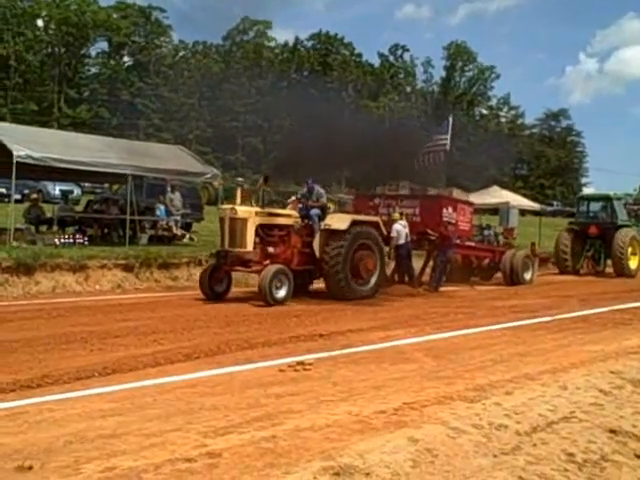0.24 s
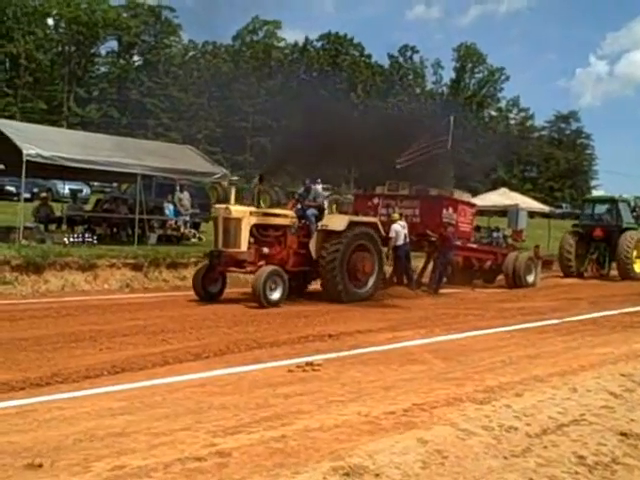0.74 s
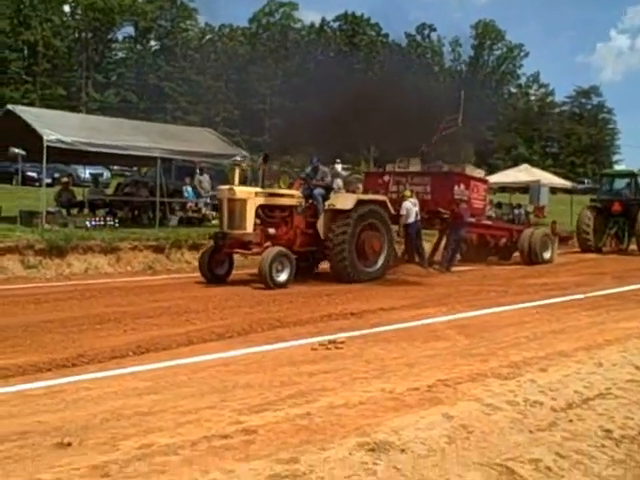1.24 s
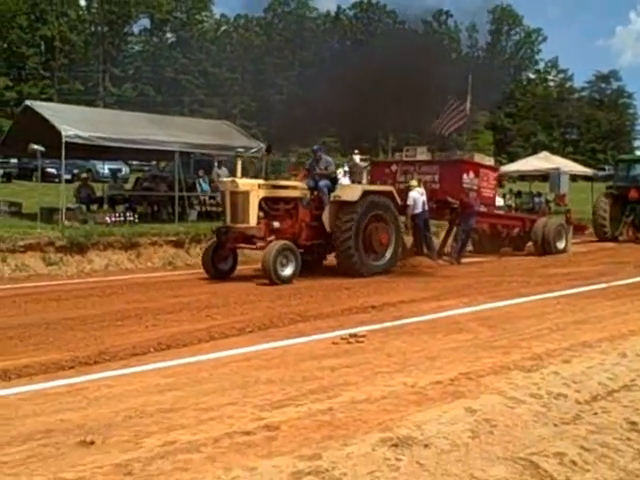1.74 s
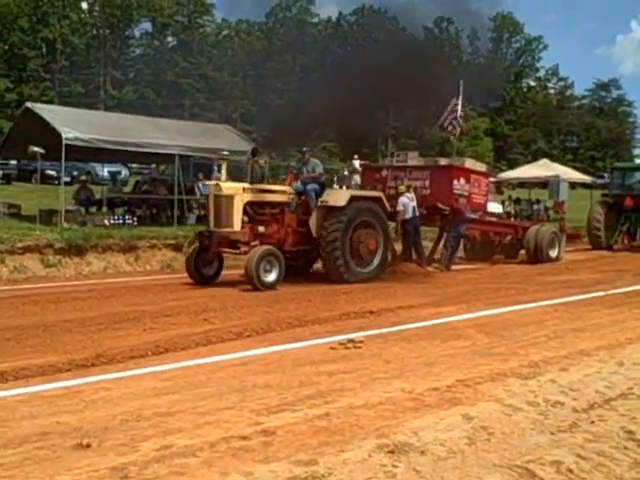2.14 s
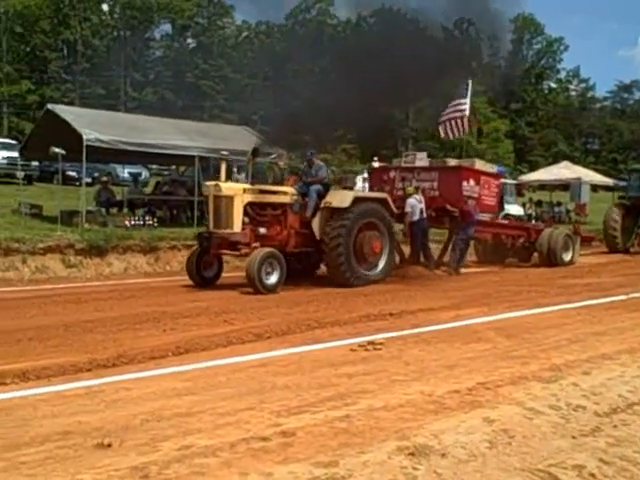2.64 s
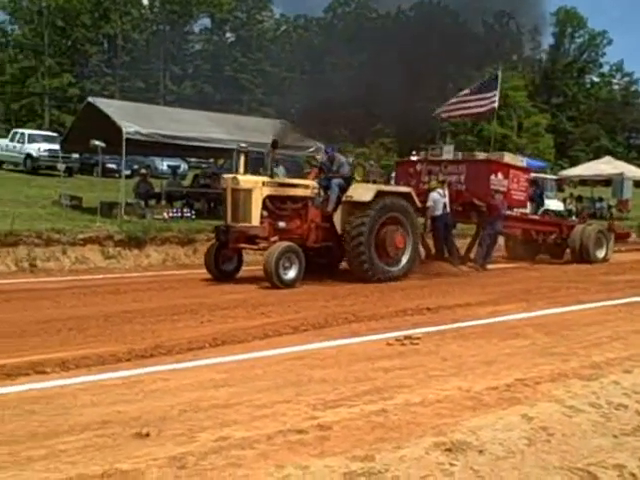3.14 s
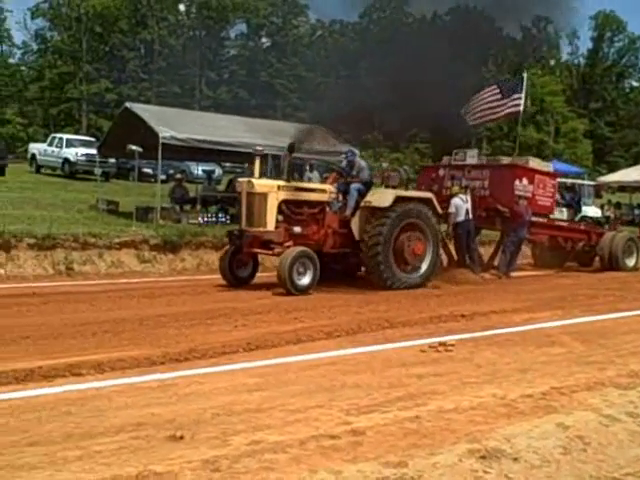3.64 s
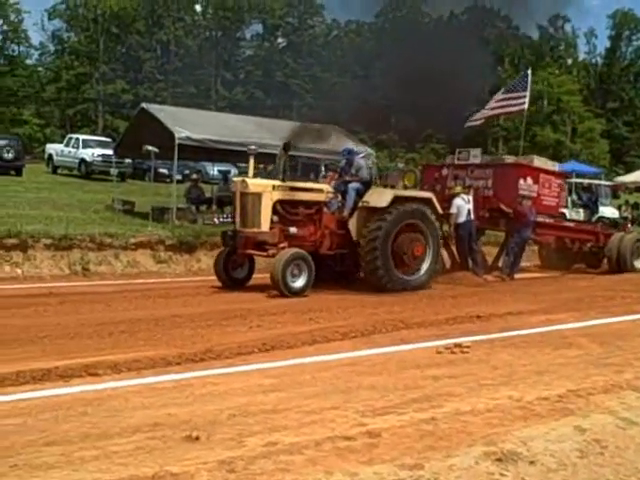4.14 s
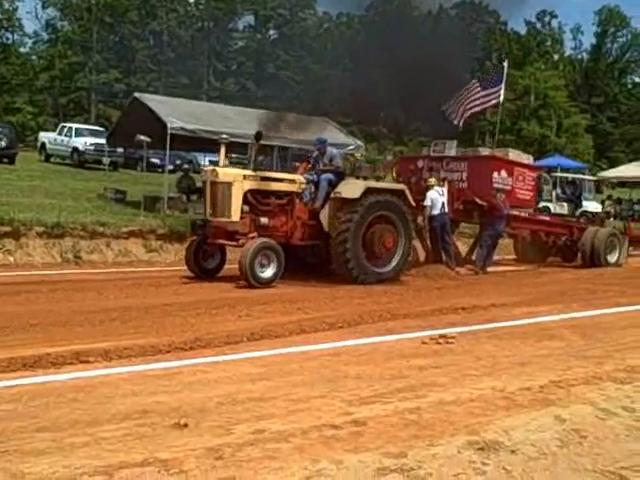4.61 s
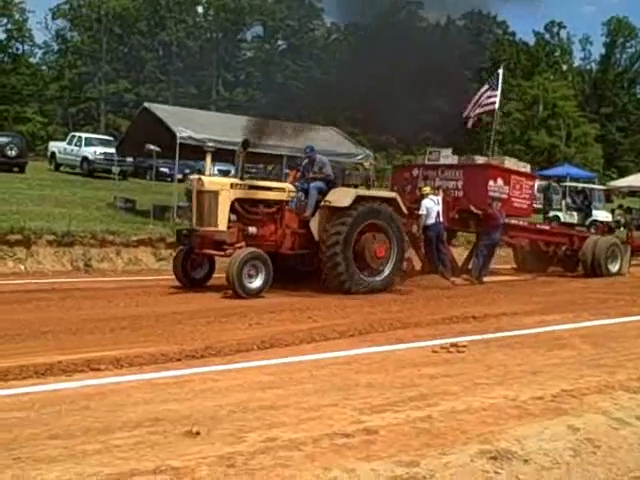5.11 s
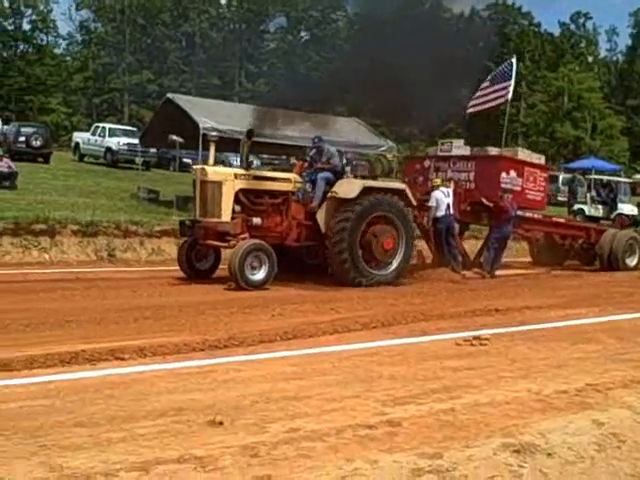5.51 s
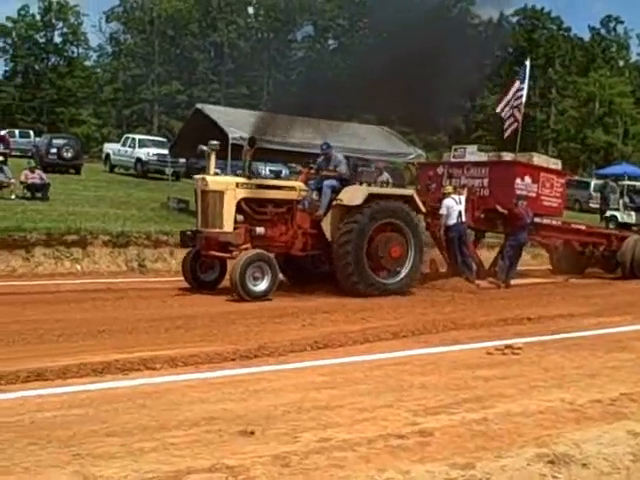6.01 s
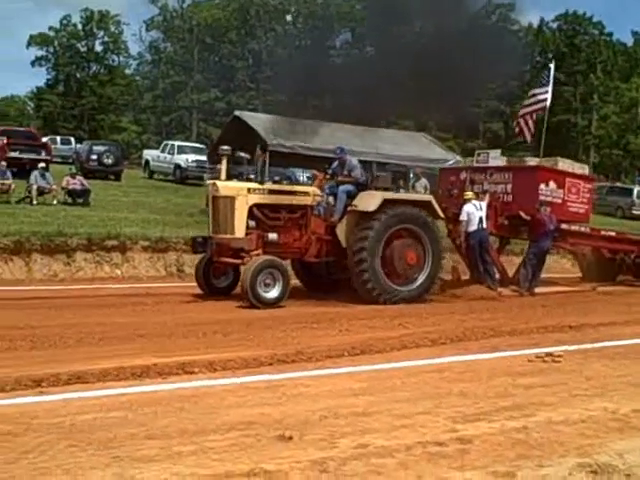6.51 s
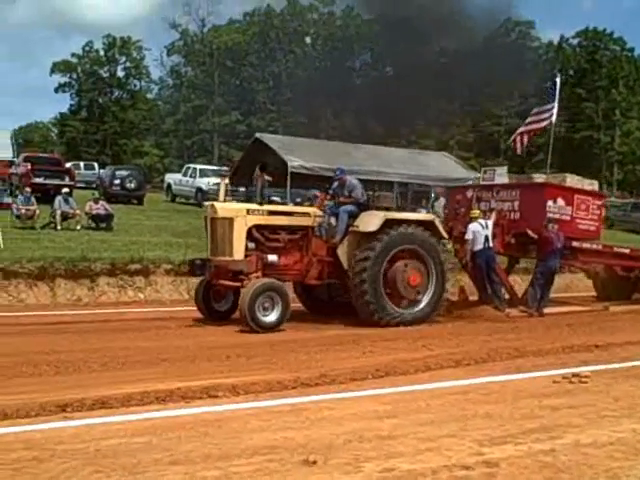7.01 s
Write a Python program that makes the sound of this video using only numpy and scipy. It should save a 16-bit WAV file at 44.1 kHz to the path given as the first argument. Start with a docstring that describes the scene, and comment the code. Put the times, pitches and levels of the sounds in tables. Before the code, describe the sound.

Outdoors beside a dirt track, an old six-cylinder tractor pulls a heavy sled at steady high revs. Its open exhaust gives a loud, low, buzzing blare with uneven roar and crisp gas crackle, slowly growing as it approaches the microphone. Just after six seconds the engine stumbles, nearly losing its firing tone, then continues slower, lower and rougher.

```python
"""Tractor pull on a dirt track

Outdoors beside an open dirt track, an old six-cylinder tractor engine draws nearer, pulling hard at governed
speed; it stumbles and goes on slower. Each firing sends a pressure pulse, a roar and a crack of gas up the open
stack. The pulses ring the pipe; roar and cracks are gusts of noise with one close ground echo. Rumble, a hum
and thin whines lie beneath; a rough drone comes with the stumble."""
import sys
import numpy as np
from scipy import signal
from scipy.fft import rfft, irfft
from scipy.io import wavfile
from scipy.ndimage import map_coordinates

SR = 44100
rng = np.random.default_rng(int(sys.argv[2]) if len(sys.argv) > 2 else 0)


def transcribe(u):
    """Save the signal u as a 16-bit wav file named by the first command-line argument.

    u: samples, shape (n,) or (channels, n), limited to [-1, 1]; the rate is SR.
    q: integer samples, one column per channel.
    """
    v = np.clip(np.atleast_2d(u).T, -1, 1)
    q = np.round(v * 32767).astype(np.int16)
    wavfile.write(sys.argv[1], SR, q)


N = 320166

# Engine speed: (time [s], firing rate [firings/s])
FIRING_RATE = [(0.0, 107.14), (1.0, 107.8), (2.0, 108.52), (3.0, 107.73), (4.0, 108.42), (5.0, 108.0),
               (5.6, 108.53), (6.1, 107.14), (6.3, 108.26), (6.4, 101.9), (6.5, 95.32), (6.62, 95.5),
               (6.8, 96.49), (7.0, 97.68), (7.26, 96.95)]
FIRST_TURN = 5.06   # firings done of the six-firing cycle at the start
# Fuel to the cylinders cuts out twice, comes back and sags once more: (time [s], firing tone level [dB])
FUEL = [(0, 0.5), (6.29, 0), (6.335, -5.5), (6.365, -17.5), (6.485, -11.5), (6.525, -2.5), (6.615, -11.5),
        (6.65, -0.5), (6.72, -2.5), (6.82, -3), (6.98, -5), (7.1, -4), (7.16, -3.5), (7.26, -2.1)]
# Exhaust gas temperature: (time [s], cooling [0 hot - 1 cooler])
COOLING = [(0, 0), (6.36, 0), (6.48, 1), (7.26, 1)]
TONE_DB, ROAR_DB, CRACK_DB = -10, -22, -29   # starting levels, before fuel and the terms below
TONE_START_DB, TONE_SETTLE_S = 2.2, 0.37   # the firing tone starts stronger and settles
ROAR_DB_PER_S, CRACK_DB_PER_S = 0.5, 0.3852   # the gas noise grows as the tractor nears
ROAR_FOLLOWS, CRACK_FOLLOWS = 0.69, 0.71   # share of the fuel's swing in dB
ROAR_COOL_DB, CRACK_COOL_DB = -1.2, -0.8   # change of level in the cooler gas

# Cylinders in firing order: (relative pulse level [dB], valve lead [ms], pulse low-pass corner [Hz])
CYLINDER_PULSES = [(-1.23, 2.28, 2500), (-2.5, 2.303, 374), (0.0, 4.03, 137), (-1.56, 3.97, 134),
                   (-0.94, 2.556, 604), (-5, 1.886, 440)]
# Open exhaust pipe: (resonance [Hz], width [Hz], level [dB])
STACK_RESONANCES = [(120, 134, -0.5), (274.5, 17, -1), (393, 236, -11)]
DOUBLING_MS = 1.144   # the pulses come doubled, which empties the band near 440 Hz
COOL_PITCH = 0.92   # pipe resonances in the cooler gas, relative to the hot
COOL_CUT_HZ = 1400   # the slower engine breathes rounder pulses
# Thin tones locked to the engine: (multiple of the six-firing cycle, relative level [dB])
WHINES = [(29, -49.5), (35, -32.5), (41, -30)]

# Cylinders in firing order, relative to the load: (roar level [dB], gas crack level [dB])
CYLINDER_GAS = [(-18, -9), (-4, 5), (-9.5, -4.5), (-3.5, 6), (-11.5, -10), (-6, -0.5)]
# Single firings with levels of their own: (time [s], gas crack level [dB], roar level [dB])
SINGLED_FIRINGS = [(0.203, -16, -26), (0.314, -18, -31), (0.407, -19, -21), (0.482, -15.5, -21),
                   (0.871, -13.5, -32), (1.04, -13.5, -26), (1.261, -11.5, -29), (1.429, -14, -31),
                   (1.65, -16, -28), (1.853, -17.5, -18), (2.093, -11, -33), (2.314, -15, -34),
                   (2.593, -17, -19), (2.759, -17, -25), (2.963, -19, -23), (3.13, -14.5, -28),
                   (3.149, -12, -33), (3.314, -11, -18), (3.37, -11, -29), (3.519, -25, -26),
                   (3.741, -33, -26), (3.759, -17, -36), (3.926, -12.5, -34), (3.962, -24, -19),
                   (3.98, -13.5, -21), (4.074, -25, -16), (4.184, -13.5, -24), (4.241, -30, -19),
                   (4.479, -17, -25), (4.515, -26, -14), (4.7, -12.5, -23), (4.739, -16, -16),
                   (4.85, -16, -17.5), (5.311, -10, -27), (5.459, -35, -19), (5.644, -10, -22),
                   (5.903, -17, -18), (6.035, -15.5, -22), (6.144, -11, -28), (6.256, -13, -26),
                   (6.293, -30, -22), (6.531, -28, -20), (6.552, -17, -20), (6.677, -13, -20),
                   (6.72, -41, -18), (6.803, -17.5, -21), (6.863, -19.5, -18), (7.03, -16, -28),
                   (7.047, -20, -18.5), (7.172, -20.5, -30), (7.233, -16, -16.5)]
# Colour of the roar: (frequency [Hz], density [dB per Hz])
ROAR_SPECTRUM = [(250, -8), (450, -6), (560, -2), (720, -1), (1150, 1.5), (1600, -4.5), (2150, 1),
                 (2600, -10), (3300, -23), (4500, -17)]
# Colour of the gas cracks: (frequency [Hz], density [dB per Hz])
CRACK_SPECTRUM = [(1500, 4.5), (2600, -1), (3100, 1.5), (3370, 5), (3750, -5.5), (4300, 0), (5200, -2.5),
                  (6400, -4.5), (7600, -0.5), (8800, -8), (10400, -4), (13000, -11.5), (15700, -12)]
# Bands in which each crack varies by itself: (upper edge [Hz], steady hiss relative to the load [dB])
CRACK_BANDS = [(3200, -9.5), (5000, -12.5), (7000, -8), (10000, -10.5), (20000, -7)]
# A band of the cracks that comes forward after the stumble
RATTLE_HZ, RATTLE_WIDTH_HZ, RATTLE_DB = 5250, 2900, -0.5

# Echo path off the dirt, lengthening as the tractor nears: (time [s], echo lag [ms])
GROUND_LAG = [(0, 1.19), (1, 1.216), (3, 1.345), (5.5, 1.419), (7.26, 1.467)]
GROUND_DB, GROUND_CUT_HZ = -4.5, 3030
GROUND_TURN = 0.69   # phase lead of the echo off soft soil, radians

# Colour of the engine rumble: (frequency [Hz], density [dB per Hz])
RUMBLE_SPECTRUM = [(20, -16), (50, 0), (85, -6.5), (140, -37), (190, 1), (300, -12), (420, -23.5)]
RUMBLE_DB = -35.5   # where the roar stands at -31 dB
WAVER_HZ, WAVER_WIDTH_HZ, WAVER_DB = 301.6, 7.9, -32.5   # a wavering hum near 300 Hz
# Rough tone heard when the pulses drop out, before its flutter: (time [s], level [dB])
DRONE_LEVEL = [(0, -70), (6.3, -69), (6.35, -36), (6.385, -15), (6.42, -20), (6.5, -32), (6.66, -18),
               (7.26, -26)]
DRONE_FLUTTER_DB, DRONE_FLUTTER_HZ = 4, 30   # rms swing, low-pass corner

BASS_CUT_HZ, CUTOFF_HZ = 10, 15700   # microphone bass, top end


def from_db(db):
    """Decibels to gain."""
    return 10 ** (np.asarray(db) / 20)


def rms_one(x):
    """Scale to unit rms."""
    return x / np.sqrt(np.mean(x ** 2) + 1e-20)


def in_time(rows):
    """Each column of a table as a curve over all samples."""
    s, *columns = np.transpose(rows)
    return [np.interp(np.arange(N) / SR, s, c) for c in columns]


def smooth(x, hz):
    """Double one-pole low-pass."""
    r = np.exp(-2 * np.pi * hz / SR)
    return signal.lfilter([(1 - r) ** 2], [1, -2 * r, r * r], x + 1e-18)


def resonance(x, hz, width_hz):
    """Band-pass of gain one at its top."""
    r = np.exp(-np.pi * width_hz / SR)
    top = np.array([1, 0, -1]) * (1 - r * r) / 2
    return signal.lfilter(top, [1, -2 * r * np.cos(2 * np.pi * hz / SR), r * r], x)


def coloured(x, spectrum):
    """Shape a wide-band signal to a spectrum; unit rms."""
    hz, db = np.transpose(spectrum)
    grid = np.log(np.fft.rfftfreq(N, 1 / SR) + 1)
    gain = from_db(np.interp(grid, np.log(hz), db, left=-70, right=-70))
    return rms_one(irfft(rfft(x) * gain, N))


def clicks(times, sizes):
    """A train of single samples."""
    out = np.zeros(N)
    at = np.round(times * SR).astype(int)
    inside = (at >= 0) & (at < N)
    np.add.at(out, at[inside], sizes[inside])
    return out


def load(cool):
    """Levels of firing tone, roar and gas cracks in dB, from fuel, nearness and gas temperature."""
    s, fuel_db = np.arange(N) / SR, in_time(FUEL)[0]
    tone_db = TONE_DB + TONE_START_DB * np.exp(-s / TONE_SETTLE_S) + fuel_db
    roar_db = ROAR_DB + ROAR_DB_PER_S * s + ROAR_FOLLOWS * fuel_db + ROAR_COOL_DB * cool
    crack_db = CRACK_DB + CRACK_DB_PER_S * s + CRACK_FOLLOWS * fuel_db + CRACK_COOL_DB * cool
    return tone_db, roar_db, crack_db


def firings():
    """Running count of firings, and the time and cylinder of each."""
    turn = FIRST_TURN + np.cumsum(in_time(FIRING_RATE)[0]) / SR
    number = np.arange(np.ceil(turn[0]), turn[-1])
    times = np.interp(number, turn, np.arange(N) / SR)
    return turn, times, number.astype(int) % len(CYLINDER_PULSES)


def stack(flow, pitch):
    """The pipe rings; the upper resonances answer in opposite sign to the lowest."""
    rung = 0
    for k, (hz, width_hz, db) in enumerate(STACK_RESONANCES):
        sign = -1 if k else 1
        rung = rung + sign * from_db(db) * resonance(flow, pitch * hz, width_hz)
    return rung


def pulses(times, cylinder, cool):
    """Pressure pulses up the stack; each cylinder has its own strength, timing and sharpness."""
    chance = rng.standard_normal((len(times), 2)) * [.06, .6]   # spread in ms and dB
    flow = 0
    for k, (db, lead_ms, soft_hz) in enumerate(CYLINDER_PULSES):
        mine = cylinder == k
        at = times[mine] + (chance[mine, 0] - lead_ms) / 1000
        flow = flow - smooth(clicks(at, from_db(db + chance[mine, 1])), soft_hz)
    hot_ring = stack(flow, 1)
    cool_ring = from_db(1.5) * smooth(stack(flow, COOL_PITCH), COOL_CUT_HZ)
    rung = (1 - cool) * hot_ring + cool * cool_ring
    lag = round(DOUBLING_MS * SR / 1000)
    rung[lag:] += rung[:-lag].copy()
    return rms_one(rung)


def whines(turn, roar_db):
    """Thin sines at whole multiples of the engine cycle, rising and falling with the roar."""
    cycle = 2 * np.pi * turn / len(CYLINDER_PULSES)
    tones = sum(from_db(db) * np.sin(k * cycle) for k, db in WHINES)
    return from_db(roar_db + 18) * tones


def turbulence(grain):
    """White noise with uneven, spiky strength."""
    unevenness = rms_one(smooth(rng.standard_normal(N), 430.0))
    return rng.standard_normal(N) * np.exp(grain * unevenness)


def gusts(times, sizes, lead_ms, rise_hz, puff_hz, tail_hz, tail):
    """Gas flow after each valve opening: a quick puff and a slower tail."""
    opened = smooth(clicks(times - lead_ms / 1000, sizes), rise_hz)

    def peak(hz):
        """Low-pass scaled so that a unit click peaks near one."""
        return smooth(opened, hz) * np.e * SR / (2 * np.pi * hz)

    return peak(puff_hz) + tail * peak(tail_hz)


def nearest(times, s):
    """Index of the firing whose gas flow starts nearest to a moment."""
    return np.argmin(abs(times - .003 - s))


def roar(times, cylinder, roar_db):
    """Mid-band jet noise: turbulence throbbing with each firing over a steady flow."""
    db = np.interp(times, np.arange(N) / SR, roar_db) + np.array(CYLINDER_GAS)[cylinder, 0]
    for s, _, own_db in SINGLED_FIRINGS:
        db[nearest(times, s)] = own_db
    steady = from_db(roar_db - 7.0)
    throb = gusts(times, from_db(db), lead_ms=3.86, rise_hz=400, puff_hz=72.0, tail_hz=28.3, tail=0.21)
    jet = (steady + throb) * rms_one(turbulence(grain=0.3))
    return coloured(jet, ROAR_SPECTRUM) * np.sqrt(np.mean(jet ** 2))


def cracks(times, cylinder, crack_db, cool, spread_db, colour_db):
    """Bright gas cracks, strongest on two cylinders and each with its own colour, over a steady hiss."""
    chance = np.clip(rng.standard_normal((len(times), 1 + len(CRACK_BANDS))), -2, 1)
    db = np.interp(times, np.arange(N) / SR, crack_db) + np.array(CYLINDER_GAS)[cylinder, 1]
    db += spread_db * chance[:, 0]
    for s, own_db, _ in SINGLED_FIRINGS:
        db[nearest(times, s)] = own_db
    noise = coloured(turbulence(grain=.25), CRACK_SPECTRUM)
    noise += cool * from_db(RATTLE_DB) * resonance(noise, RATTLE_HZ, RATTLE_WIDTH_HZ)
    out, below = 0, 0
    for k, (edge_hz, steady_db) in enumerate(CRACK_BANDS):
        # each band is what this low-pass adds to the one before
        low = signal.sosfiltfilt(signal.butter(2, edge_hz, fs=SR, output="sos"), noise)
        sizes = from_db(db + colour_db * chance[:, k + 1])
        flow = gusts(times, sizes, lead_ms=4.1, rise_hz=112, puff_hz=134.6, tail_hz=29.0, tail=0.13)
        out = out + (low - below) * (from_db(crack_db + steady_db) + flow)
        below = low
    return out


def ground(x):
    """One slightly dull echo off the dirt; its lag cuts moving notches."""
    late = np.arange(N) - in_time(GROUND_LAG)[0] * SR / 1000
    dull = signal.lfilter(*signal.butter(1, GROUND_CUT_HZ, fs=SR), x)
    turned = irfft(rfft(dull) * np.exp(1j * GROUND_TURN), N)
    echo = map_coordinates(turned, [late], order=3, mode="nearest")
    return x + from_db(GROUND_DB) * echo


def rumble(roar_db):
    """Low noise of block, gears and sled, following the roar by 0.3 of its swing in dB."""
    return from_db(RUMBLE_DB + 0.3 * (roar_db + 31)) * coloured(rng.standard_normal(N), RUMBLE_SPECTRUM)


def hum(cool):
    """Noise through two equal narrow resonances wavers as a tone; it ends with the stumble."""
    once = resonance(rng.standard_normal(N), WAVER_HZ, WAVER_WIDTH_HZ)
    twice = resonance(once, WAVER_HZ, WAVER_WIDTH_HZ)
    return from_db(WAVER_DB) * rms_one(twice) * (1 - cool)


def drone(turn):
    """A fluttering sine at twice the firing rate, roughened with low noise."""
    rough = coloured(rng.standard_normal(N), RUMBLE_SPECTRUM)
    flutter = rms_one(smooth(rng.standard_normal(N), DRONE_FLUTTER_HZ))
    tone = from_db(DRONE_FLUTTER_DB * flutter) * np.sin(4 * np.pi * turn)
    return from_db(in_time(DRONE_LEVEL)[0]) * (tone + .4 * rough)


def scene():
    """Engine layers under the load curves; the gas noise is heard directly and off the ground."""
    cool = in_time(COOLING)[0]
    tone_db, roar_db, crack_db = load(cool)
    turn, times, cylinder = firings()
    beat = from_db(tone_db) * pulses(times, cylinder, cool)
    gas = roar(times, cylinder, roar_db)
    gas += cracks(times, cylinder, crack_db, cool, spread_db=5.5, colour_db=5.0)
    mix = beat + whines(turn, roar_db) + ground(gas) + rumble(roar_db) + hum(cool) + drone(turn)
    return mix[None]


def record(dry):
    """The microphone thins the deepest bass; peaks are rounded and the top is cut."""
    thinned = signal.lfilter(*signal.butter(1, BASS_CUT_HZ, "high", fs=SR), dry)
    rounded = 1.442 * np.tanh(thinned / 1.406)
    return signal.sosfilt(signal.cheby2(16, 60, CUTOFF_HZ, fs=SR, output="sos"), rounded)


dry = scene()
out = record(dry)
transcribe(out)
```